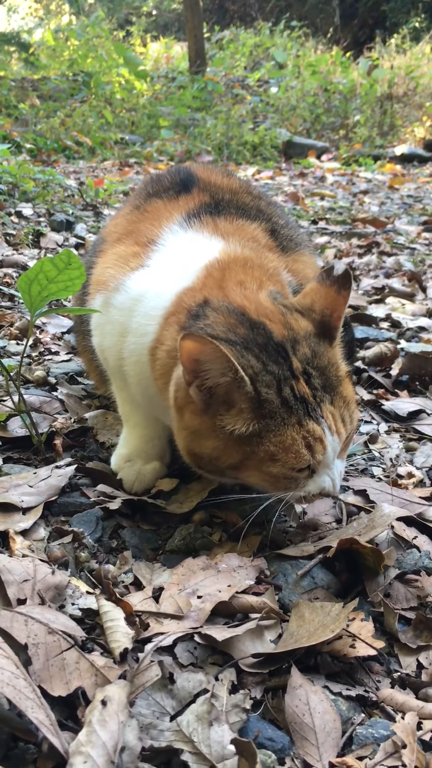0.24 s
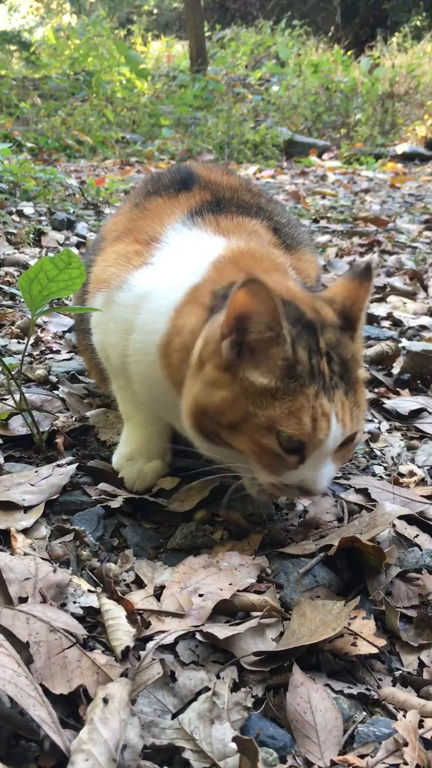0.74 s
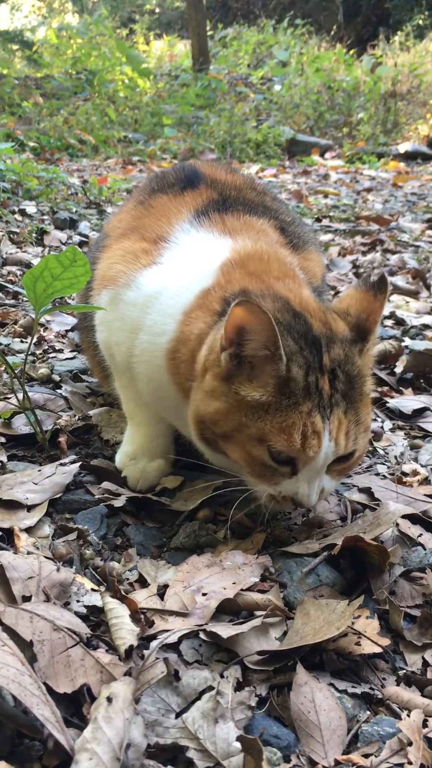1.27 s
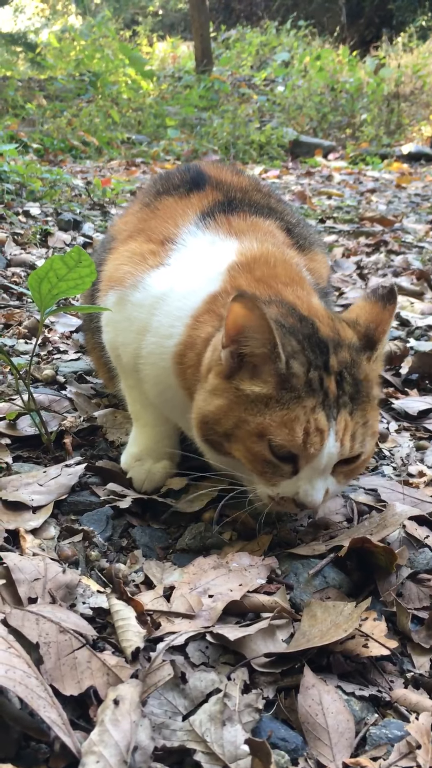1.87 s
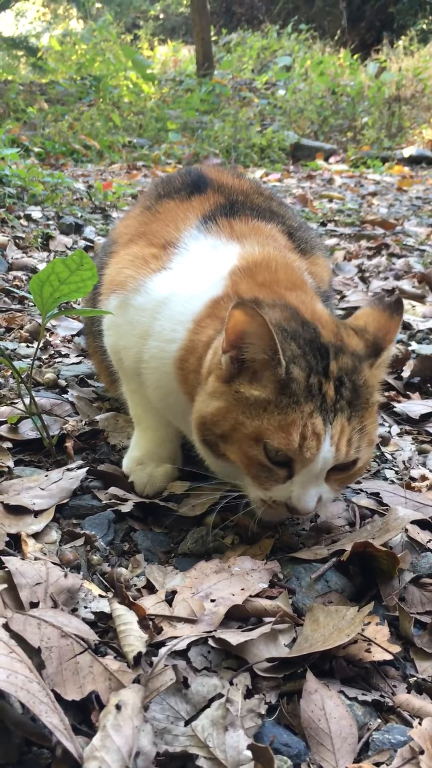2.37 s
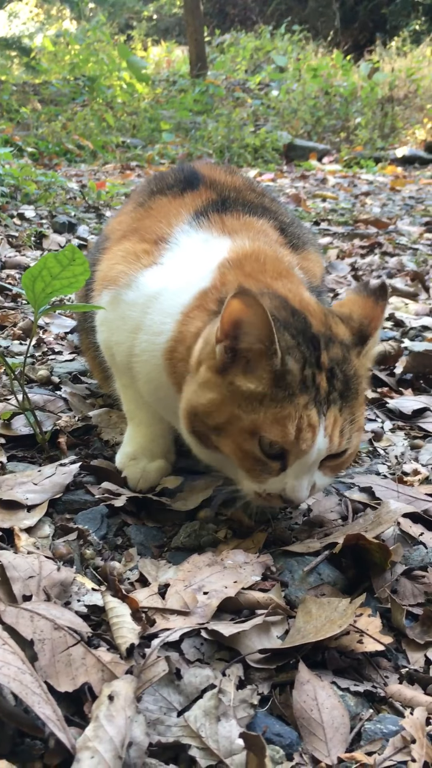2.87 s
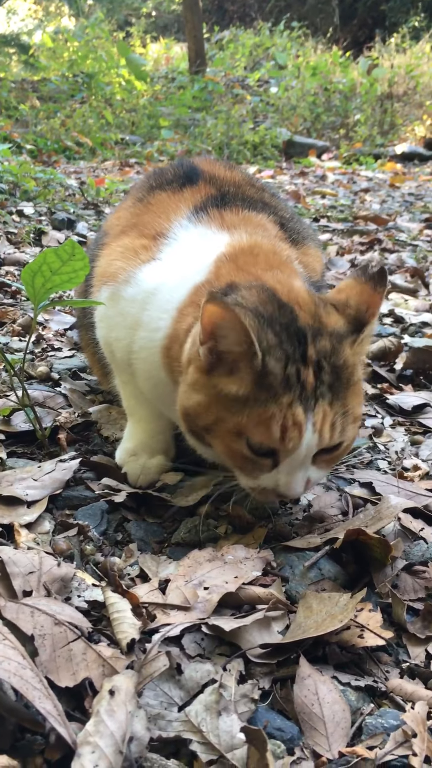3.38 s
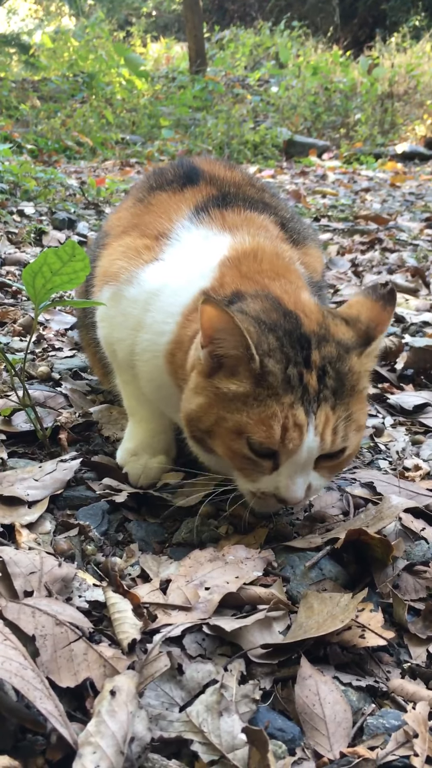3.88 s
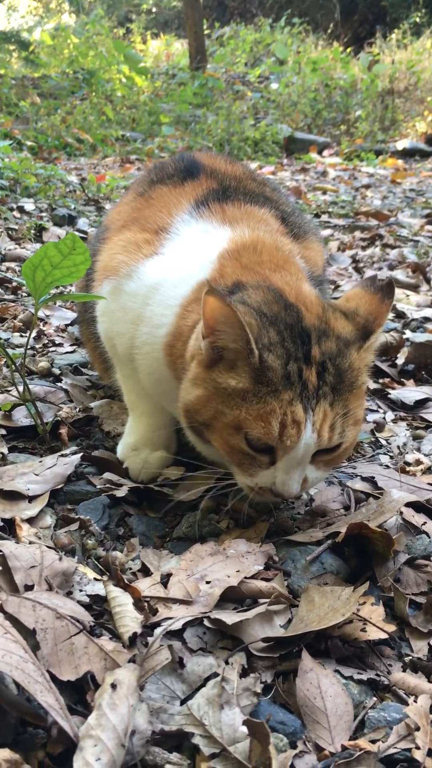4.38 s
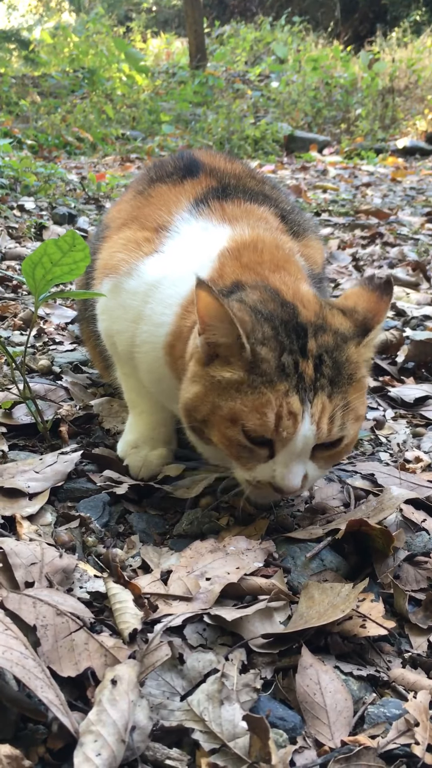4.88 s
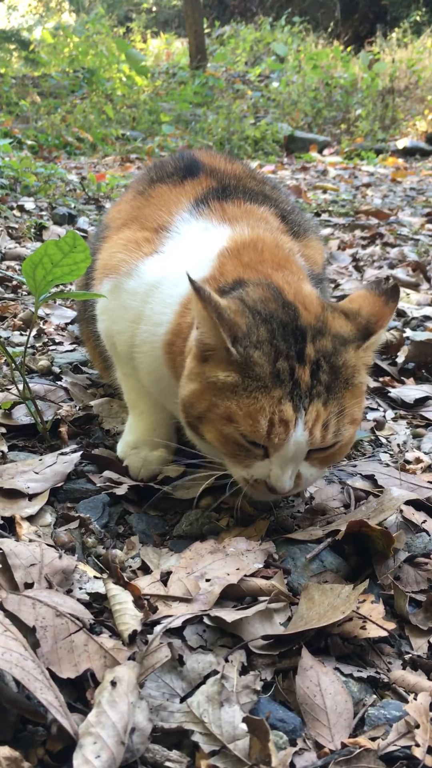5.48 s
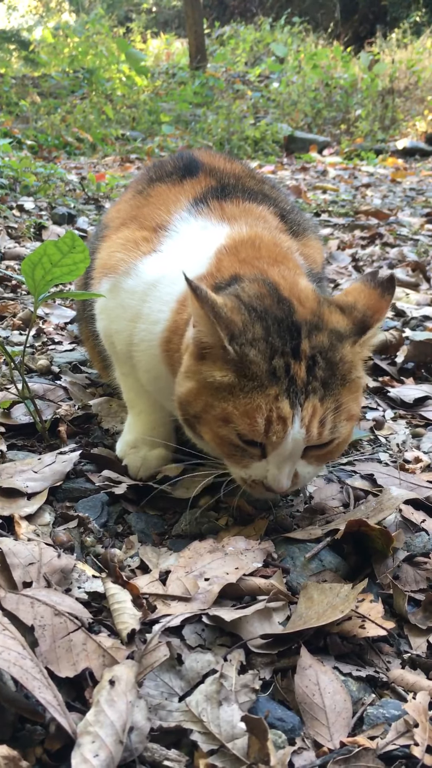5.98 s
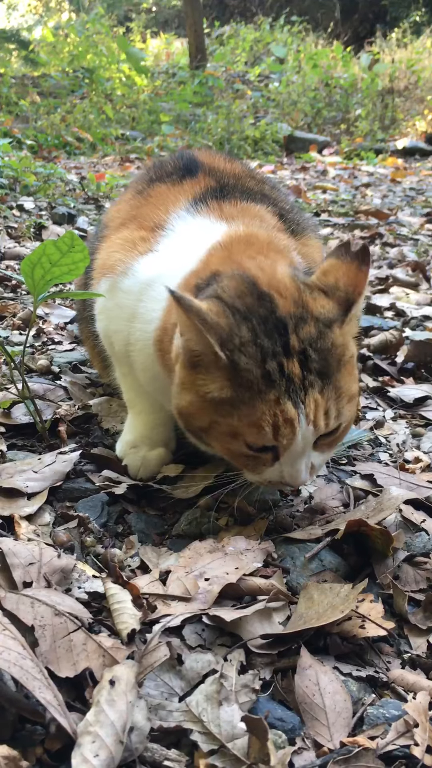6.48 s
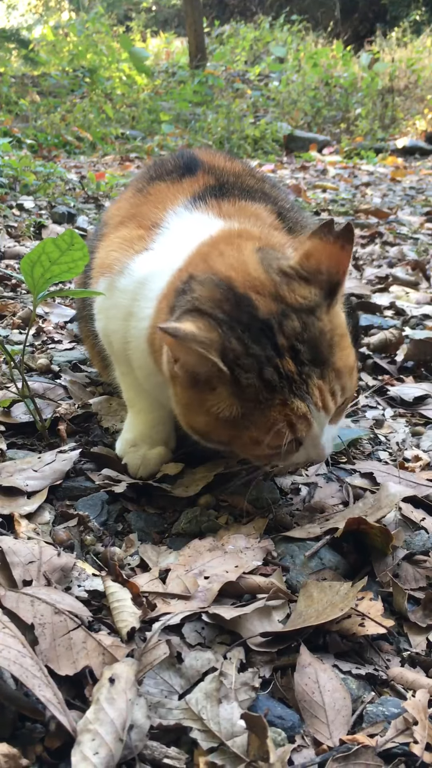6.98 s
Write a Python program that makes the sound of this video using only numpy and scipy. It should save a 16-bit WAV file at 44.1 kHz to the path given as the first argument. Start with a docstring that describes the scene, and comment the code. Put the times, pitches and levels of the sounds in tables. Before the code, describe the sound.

Close outdoor chewing: brittle bone snaps about twice a second, light tooth clicks, moist crackle, one distant dull thud, and constant faint hiss.

```python
"""A cat crunches a small fish on dry leaves, close by outdoors, over a low rumble and a steady hiss.
It opens on one bite, faint ticks and a little wet crackle; a single dull thud sounds in the distance near 1 s.
From 1.7 s about two bites a second snap fine bones, with light tooth clicks and wet crackles between them.
After 6 s the ticks thin out. Snaps, clicks and crackles are noise bursts shaped by the mouth and scattered
by leaves; the thud is coloured noise with decaying sines, and the bed is filtered noise."""
import sys
import numpy as np
from scipy import signal
from scipy.fft import rfft, irfft
from scipy.io import wavfile
from scipy.ndimage import uniform_filter1d

SR = 44100
rng = np.random.default_rng(int(sys.argv[2]) if len(sys.argv) > 2 else 0)


def unload_audio(sound):
    """Save the sound as a 16-bit wav file, at the path given as the first command line argument."""
    columns = np.transpose(np.atleast_2d(sound))
    # keep every value between -1 and 1, then stretch to whole-number steps
    steps = np.round(np.clip(columns, -1, 1) * 32767)
    wavfile.write(sys.argv[1], SR, steps.astype(np.int16))


N = 319224
TAPS = 1024  # length of the short filters, in samples
# 1 Hz is added so that logarithms and divisions never meet zero
GRID = np.fft.rfftfreq(TAPS, 1 / SR) + 1
FINE = np.fft.rfftfreq(N, 1 / SR) + 1
TIME = np.arange(N) / SR

# Bites that break bone; levels are relative, before the mouth and the trims in crunches():
# start_s, run_length_s, tear_time_s, change_per_snap_db, snap_db, tilt_db_per_octave,
# low_ring_hz, low_ring_db, high_ring_hz, high_ring_db, wet_sizzle_db, jaw_thump_db
BONE_BITES = [(0.1221, 0.00091, .00025, 0, -19, -2, 3070, 12, 6200, 2.5, 4.5, 1),
              (1.6773, 0.00023, 0.00021, 0, -4, -1, 5560, 6.5, 7880, 3.5, -26, -7.5),
              (2.163, 0.011, 0.00058, 1, -15.5, -1.5, 5010, -10.5, 9150, -6.5, -16, -11.5),
              (2.5536, 0.00055, 0.00035, 0, -15.5, 3, 4310, -13, 9400, -2.5, -26, -9),
              (3.057, 0.014, .00018, -1.5, -15.5, 0.3, 6820, -5.5, 9110, -4.5, -28, -12),
              (3.524, 0.013, .00036, -10.5, -11.5, -2.5, 3580, -6, 7810, -17, -20, -7.5),
              (4.0434, 0.0049, 0.00068, 3.5, -23, -3.5, 2800, -16, 4130, -21, -29, -19),
              (4.5292, .0096, 0.00049, -7, -6.5, -2, 2650, -6, 4700, -1.5, -17, -3),
              (5.0913, .015, 0.00046, -9.5, -8, -2.3, 1000, -9, 4400, 0.5, -1.5, -3),
              (5.4854, 0.00066, 0.00058, 0, -16.5, -3.5, 2550, -17, 4460, -3, -2, -12),
              (5.5257, 0, 0.00019, 0, -6, -1, 2500, -3, 4100, 1.5, -17, -7.5),
              (5.9076, 0.0055, 0.00085, 0.5, -19.5, 0.5, 2300, -6, 4400, -10, -9, -18)]
# Light clicks of the teeth between bites, before the mouth: start_s, click_db, ring_hz, ring_db
TEETH_MEETING = [(1.632, -24, 5900, -12), (1.9536, -26, 6250, -22), (2.1296, -18, 4800, -17),
                 (2.3574, -25, 12500, -31), (2.6018, -30, 9200, -15), (3.0001, -24, 6440, -9),
                 (3.0458, -23, 8910, -12), (3.0835, -28, 7200, -15), (3.103, -25, 4600, -16),
                 (4.0075, -16.5, 13500, -11), (4.0887, -23, 15100, -10), (4.1075, -34, 12300, -16),
                 (4.3243, -30, 4600, -13), (4.4718, -25, 4425, -18), (4.5002, -19.5, 2453, -17),
                 (4.522, -23, 14000, -10), (4.527, -13, 14000, -14), (4.617, -19.5, 9000, -5),
                 (4.6696, -22.5, 15200, -7), (4.7135, -31, 12000, -12), (4.8468, -31, 11000, -16),
                 (5.0617, -21, 12600, -16), (5.2844, -35, 13300, -23), (5.5376, -33, 14600, -14),
                 (5.6443, -36, 4800, -15), (6.0045, -27, 12000, -18)]
# Wet flesh and tongue peeling apart: start_s, length_s, level_db, tilt_db_per_octave
WET_PEELS = [(0.713, 0.031, -58, 2), (1.483, 0.011, -57, 8), (4.023, 0.016, -53, 1.2),
             (4.045, 0.014, -49.5, 2), (4.531, .013, -44, 3), (4.633, 0.024, -48.5, 5),
             (5.089, 0.024, -46, 0), (5.436, 0.013, -56, 3), (5.913, .005, -48, 10),
             (5.998, 0.0053, -49, 1), (6.976, .011, -54, 8)]
# How thickly the faint ticks fall while the cat chews: time_s, ticks_per_s
CHEWING_PACE = [(0, 40), (1.2, 59), (2.0, 45), (3.7, 32), (4.6, 81), (6.0, 50), (6.2, 7.1), (7.24, 8)]
# Tone of the mouth around each close sound: frequency_hz, gain_db
MOUTH_TONE = [(100, -29), (300, -18), (750, -18.5), (1050, -5.5), (1450, 1), (1700, 1.5), (2030, -5.5),
              (2500, -1.5), (3050, -5.5), (3900, -0.5), (6500, -1), (13500, -2), (16500, -15)]
# Ringing modes of the distant hollow thing: frequency_hz, level_db, t60_s
HOLLOW_MODES = [(140, -31, 0.22), (313, -48, 0.17), (597, -38, .12), (772, -30, 0.08), (853, -36, 0.11),
                (1420, -36, .09)]
# Noise spectrum of the thud, before its envelope: frequency_hz, level_db_per_hz
THUD_NOISE = [(50, -78), (130, -59), (220, -69.5), (420, -77.5), (750, -71), (1300, -70), (1900, -76.5),
              (3700, -78.5), (4900, -87), (12000, -102)]
# Low outdoor rumble: frequency_hz, level_db_per_hz
LOW_RUMBLE = [(15, -104), (28, -85), (42, -76.5), (62, -70.5), (110, -81), (175, -82), (260, -91),
              (500, -102), (1500, -125)]
# Steady hiss, before its slight waver: frequency_hz, level_db_per_hz
STEADY_HISS = [(100, -100), (300, -92.5), (700, -94), (1300, -90.5), (2100, -93), (3200, -92), (6500, -94),
               (9000, -96), (12000, -99.2), (14000, -103), (15700, -107.5), (16200, -128)]
# Treble dips of the microphone port: centre_hz, width_hz, gain_db
PORT_NOTCHES = [(4870, 480, -4), (7640, 510, -3), (10450, 230, -7.5)]

JAW_HZ, JAW_T60_S = 445, 0.011  # the skull and mouth cavity answer each snap
SNAP_GAP_S, SNAP_JITTER_S = 0.0065, 0.0005  # rough spacing of the snaps as a bone gives way
SIZZLE_HZ = 12800  # wet flesh around the bone
THUD_S = 1.04
EDGE_HZ = 16800  # upper band limit


def amp(db):
    """Decibels to gain."""
    return 10 ** (np.asarray(db) / 20)


def read(points, hz):
    """A spectrum joined by straight lines on a log-frequency axis."""
    f, value = np.transpose(points)
    return np.interp(np.log(hz), np.log(f), value)


def add(mix, s, sound):
    """Mixes a sound in at time s."""
    part = mix[max(round(s * SR), 0):][:len(sound)]
    part += sound[:len(part)]


def noise(points):
    """Steady noise with the given dB per Hz."""
    white = rfft(rng.standard_normal(N))
    return irfft(white * amp(read(points, FINE)), N) * np.sqrt(SR / 2)


def causal(gain):
    """The quickest-starting impulse (minimum phase) that has this gain over frequency."""
    cepstrum = irfft(np.log(gain + 1e-7))
    cepstrum[1:TAPS // 2] *= 2
    cepstrum[TAPS // 2 + 1:] = 0
    return irfft(np.exp(rfft(cepstrum)))


def fade(t, t60):
    """Exponential decay, 60 dB in t60 seconds."""
    return np.exp(-np.log(1000) * np.maximum(t, 0) / t60)


def tilted(tilt_db):
    """Gain sloping about 5 kHz, level below 800 Hz: finer fibres break brighter."""
    return amp(tilt_db * np.log2(np.maximum(GRID, 800) / 5000))


def ring(hz, sharpness):
    """Gain of a heavily damped resonance, 1 at its centre."""
    return 1 / (1 + (sharpness * (GRID / hz - hz / GRID)) ** 2)


def crunches(snap_db=0.47, thump_db=-27.5, low_sharpness=3.85, high_sharpness=4.6, sizzle_sharpness=4.4):
    """Each bite breaks a bone in one or more snaps that ring its splinters and thump the jaw."""
    out = np.zeros(N)
    for (s, run_s, tear_s, step_db, db, tilt, low_hz, low_db,
         high_hz, high_db, sizzle_db, jaw_db) in BONE_BITES:
        low_splinter = amp(low_db) * ring(low_hz, low_sharpness)
        high_splinter = amp(high_db) * ring(high_hz, high_sharpness)
        sizzle = amp(sizzle_db) * ring(SIZZLE_HZ, sizzle_sharpness)
        colour = amp(db) * tilted(tilt) + low_splinter + high_splinter + sizzle
        snap_count = 1 + round(abs(run_s) / SNAP_GAP_S)
        for k, delay in enumerate(np.linspace(0, run_s, snap_count)):
            # the first snap is on time, the later ones stray a little
            when = s + delay + SNAP_JITTER_S * min(k, 1) * rng.standard_normal()
            bone = amp(snap_db) * in_mouth(colour, tear_s)
            jaw = amp(jaw_db + thump_db) * jaw_thump()
            add(out, when, amp(k * step_db) * (bone + jaw))
    return out


def snap(tear_s):
    """Spectrum of one tiny fracture: ragged in time, nearly even in colour."""
    t = TIME[:TAPS]
    tear = rfft(rng.standard_normal(TAPS) * t * np.exp(-t / max(tear_s, 1 / SR)))
    power = abs(tear) ** 2
    # divide out the broad colour and keep the fine raggedness
    broad = np.sqrt(uniform_filter1d(power, size=21) + 0.03 * power.mean())
    return tear / rfft(causal(broad))


def in_mouth(colour, tear_s):
    """One snap of this colour, heard through the mouth."""
    mouth = amp(read(MOUTH_TONE, GRID))
    return irfft(snap(tear_s) * rfft(causal(colour * mouth)))


def jaw_thump(rise_s=0.00089, scatter=0.091):
    """The jaw rings briefly as a decaying sine, at a slightly different pitch each time."""
    t, hz = TIME[:TAPS], JAW_HZ * (1 + scatter * rng.standard_normal())
    return np.sin(2 * np.pi * hz * t) * fade(t, JAW_T60_S) * (1 - np.exp(-t / rise_s))


def tooth_clicks(contact_s=0.0002, sharpness=3.7, even_hz=4500, brighten_db=2.4,
                 tooth_hz=4300, tooth_sharpness=6.2, thump_db=-32.0):
    """Teeth meet in single light clicks over one shared tooth ring; a higher ring brings a brighter click."""
    out = np.zeros(N)
    for s, db, hz, ring_db in TEETH_MEETING:
        click = tilted(brighten_db * np.log2(hz / even_hz)) + ring(tooth_hz, tooth_sharpness)
        colour = amp(db) * click + amp(ring_db) * ring(hz, sharpness)
        add(out, s, in_mouth(colour, contact_s) + amp(db + thump_db) * jaw_thump())
    return out


def crackles(pops_per_s=2500):
    """Tiny films of saliva burst in quick swarms: sparse stronger pops over a grainy noise floor."""
    out, mouth = np.zeros(N), amp(read(MOUTH_TONE, GRID))
    for s, length, db, tilt in WET_PEELS:
        size, when = rng.standard_normal(2 * TAPS), rng.random(2 * TAPS)
        pops = size * (0.63 + (when < pops_per_s / SR))
        pops = pops[:max(round(length * SR), 32)]
        pops = pops * signal.windows.tukey(len(pops), .5)
        swarm = signal.fftconvolve(pops, causal(tilted(tilt) * mouth))
        even_level = np.sqrt(len(pops) / np.sum(swarm ** 2))
        add(out, s, amp(db) * swarm * even_level)
    return out


def ticks(level_db=-37.5, spread_db=3.0, tilt_db=-0.5, fizz_db=-79.0, fizz_swing_db=10.5, fizz_tilt_db=1.5):
    """Faint ticks of teeth and patches of moist fizz, thicker while the cat chews hard."""
    rate = np.interp(TIME, *np.transpose(CHEWING_PACE))
    mouth = amp(read(MOUTH_TONE, GRID))
    size = amp(level_db + spread_db * np.minimum(rng.exponential(1, N), 3))
    train = size * (rng.random(N) < rate / SR)
    # smoothed noise makes the fizz come and go in patches
    patches = uniform_filter1d(uniform_filter1d(rng.standard_normal(N), size=2200), size=900)
    swell = amp(fizz_db + fizz_swing_db * np.minimum(patches / patches.std(), 2))
    fizz = rng.standard_normal(N) * np.sqrt(abs(rate / rate.mean())) * swell
    teeth = signal.oaconvolve(train, causal(tilted(tilt_db) * mouth))
    moisture = signal.oaconvolve(fizz, causal(tilted(fizz_tilt_db) * mouth))
    return (teeth + moisture)[:N]


def leaf_litter(x, near_db=-16.5, near_t60=0.0085, far_db=-19.0, far_t60=0.052):
    """The leaves under the chin scatter each sound at once; the ground around adds a faint short tail."""
    t, echo = TIME[:4 * TAPS], 0
    for db, t60, delay_s in ((near_db, near_t60, .0006), (far_db, far_t60, .003)):
        scatter = rng.standard_normal(len(t)) * fade(t, t60) * (t > delay_s)
        echo = echo + amp(db) * scatter / np.linalg.norm(scatter)
    return x + signal.oaconvolve(x, echo)[:N]


def far_thud(rise_s=0.013, blow_t60=0.115, tail_db=-6.5, tail_t60=0.68, build_cycles=2.4, grain_db=4.0):
    """A dull, distant blow on something hollow: a grainy knock, then a slower boom and an outdoor tail."""
    t = np.maximum(TIME - THUD_S, 0)
    grain = uniform_filter1d(rng.standard_normal(N), SR // 300)
    knock = amp(grain_db * np.tanh(grain / grain.std())) * fade(t, blow_t60)
    tail = amp(tail_db) * fade(t, tail_t60)
    blow = noise(THUD_NOISE) * (knock + tail)
    boom = np.zeros(N)
    for hz, db, t60 in HOLLOW_MODES:
        tone = np.sin(2 * np.pi * (hz * t + rng.random()))
        build = 1 - np.exp(-hz * t / build_cycles)
        boom += amp(db) * tone * fade(t, t60) * build
    return np.minimum(t / rise_s, 1) * (blow + boom)


def background(waver_db=0.47):
    """Low outdoor rumble and a steady hiss that barely wavers, both shaped noise."""
    drift = uniform_filter1d(rng.standard_normal(N), SR // 10)
    return noise(LOW_RUMBLE) + noise(STEADY_HISS) * amp(waver_db * drift / drift.std())


def scene():
    """The cat close by, the rest far away; both channels carry the same sound."""
    cat = crunches() + tooth_clicks() + crackles() + ticks()
    mono = leaf_litter(cat) + far_thud() + background()
    return np.array([mono, mono])


def record(dry):
    """The microphone port cuts three dips in the treble; then the band limit."""
    port_db = sum(db * np.exp(-((FINE - hz) / width) ** 2) for hz, width, db in PORT_NOTCHES)
    coloured = irfft(rfft(dry) * amp(port_db), N)
    band_limit = signal.firwin(401, EDGE_HZ, window=("kaiser", 9), fs=SR)
    return signal.oaconvolve(coloured, band_limit[None], "same")


dry = scene()
out = record(dry)
unload_audio(out)
```